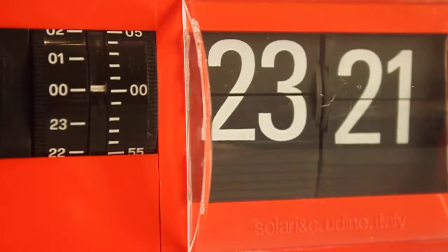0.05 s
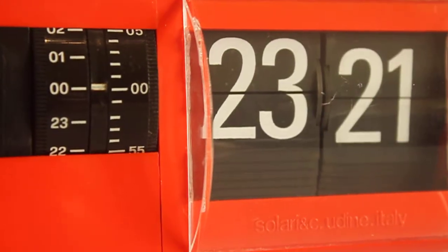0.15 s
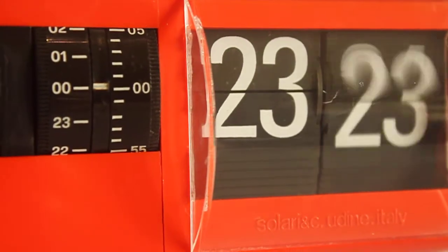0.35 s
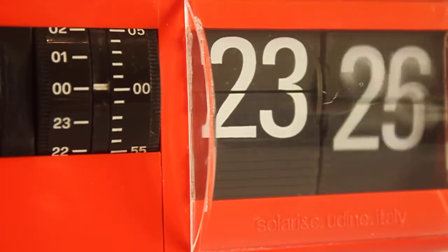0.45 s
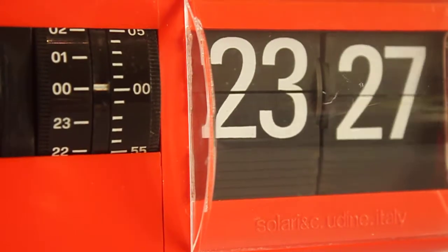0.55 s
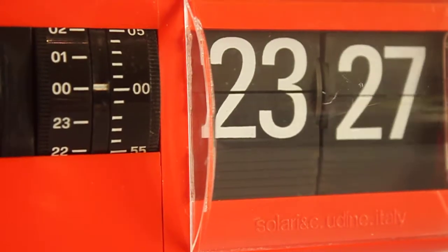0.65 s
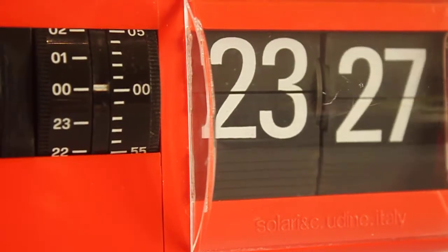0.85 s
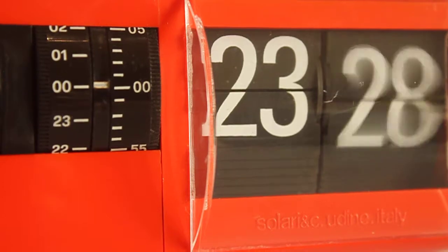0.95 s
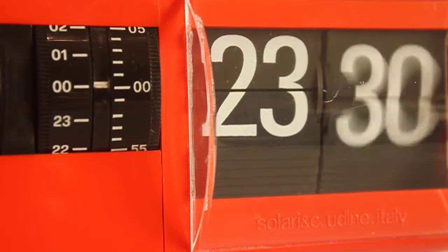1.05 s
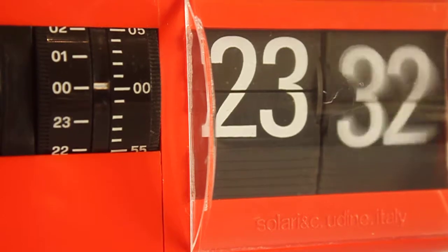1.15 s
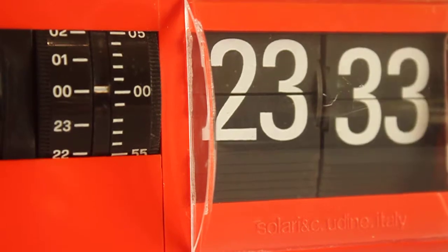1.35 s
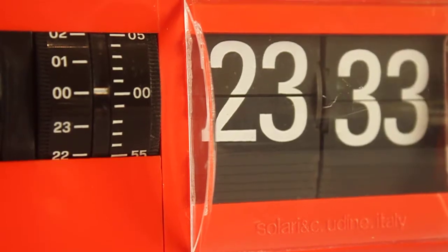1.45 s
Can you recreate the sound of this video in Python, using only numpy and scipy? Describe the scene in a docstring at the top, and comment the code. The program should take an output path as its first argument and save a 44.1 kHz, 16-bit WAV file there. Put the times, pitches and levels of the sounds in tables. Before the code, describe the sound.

A flip clock is wound forward by hand, close by in a quiet room. After soft knocks from the setting wheel, six plastic flaps snap down with quick, bright clicks from about 0.2 to 0.5 seconds. The wheel knocks faintly in the pause, then six more flaps click from 0.9 to 1.15 seconds. A few tiny knocks follow until 1.4 seconds. Near walls echo slightly over faint hum and hiss.

```python
"""In a quiet room, close by, a flip clock is wound forward by hand in two runs of six flaps.
Each plastic flap slips off its catch, slaps the stack of flaps and makes the case ring.
The setting wheel knocks softly in between. Near walls echo, over a faint hum and hiss."""
import sys
import numpy as np
from scipy import signal
from scipy.fft import rfft, irfft
from scipy.io import wavfile

SR = 44100
rng = np.random.default_rng(int(sys.argv[2]) if len(sys.argv) > 2 else 0)


def store_pcm(level_fs):
    """Save levels as 16-bit WAV."""
    pcm = np.round(np.clip(level_fs, -1, 1) * 32767).astype(np.int16)
    wavfile.write(sys.argv[1], SR, np.atleast_2d(pcm).T)


N = 66150
T = np.arange(SR // 5) / SR  # time axis of one short sound, in seconds
HZ = np.fft.rfftfreq(len(T), 1 / SR)  # its frequency axis


def amp(db):
    """Turn decibels into a gain."""
    return 10 ** (np.asarray(db) / 20)


def curve_at(points, hz):
    """Read a curve of (f/Hz, value) points, joined by straight lines on a log frequency axis."""
    freqs, values = np.transpose(points)
    return np.interp(np.log(hz + 1), np.log(freqs + 1), values)


def same_energy(x):
    """Scale a short sound to the energy of 5 ms at a steady level of 1."""
    return x / np.sqrt(np.sum(x ** 2) / (.005 * SR) + 1e-20)


def fade(t60, delay=0, rise=.0002):
    """A loudness shape that waits, rises quickly, then drops 60 dB every t60 seconds."""
    t = np.maximum(T - delay, 0)
    return (1 - np.exp(-t / rise)) * amp(-60 * t / t60)


def rattle(shape):
    """The force of many tiny random contacts, following a loudness shape."""
    return shape * rng.standard_normal(len(T))


def ring(force, tones, pitch=1):
    """A struck part rings at its own tones; the narrower a tone, the longer it lasts."""
    spectrum = rfft(force)
    sound = np.zeros(len(T))
    for k, (centre, width, db) in enumerate(tones):
        resonance = 1j * HZ / ((centre * pitch) ** 2 - HZ ** 2 + 1j * HZ * width)
        tone = same_energy(irfft(spectrum * resonance, len(T)))
        sound += (-1) ** k * amp(db) * tone  # every other tone is flipped in sign
    return same_energy(sound)


def snap(force, colour):
    """A force heard with a broad tone colour and no pitch."""
    sound = irfft(rfft(force) * amp(curve_at(colour, HZ)), len(T))
    return same_energy(sound * (T < T[-1] / 2))


def add(track, start_s, x):
    """Mix a sound into a track at a given time."""
    part = track[round(start_s * SR):][:len(x)]
    part += x[:len(part)]


def in_room(x, spill=0):
    """Add wall echoes and a fading tail to a sound; the spill is heard only through those echoes."""
    # how long the tail takes to drop 60 dB: f/Hz, t/s
    tail_times = [(150, 0.7), (1200, 0.21), (4000, 0.21), (8000, 0.48), (12000, 0.27), (16000, 0.2)]
    # strength of the tail: f/Hz, level/dB
    tail_levels = [(100, -7.5), (400, -6.5), (1200, -7.5), (2500, -6), (4200, -11), (5600, -20),
                   (8000, -20), (10000, -22.5), (12000, -17.5), (13600, -26), (14600, -19), (16000, -15.5)]
    # echoes from near walls: delay/s, level/dB
    walls = [(0.0122, -24), (0.011, -31.5), (.0203, -32)]
    hz, t, noise = signal.stft(rng.standard_normal(SR // 2), SR, nperseg=256)
    t60 = curve_at(tail_times, hz)[:, None]
    gain = amp(curve_at(tail_levels, hz))[:, None]
    gain *= np.sqrt(2 * np.log(1000) / (t60 * SR))  # a longer tail gets no extra energy
    tail = signal.istft(noise * gain * amp(-60 * t / t60), SR, nperseg=256)[1]
    age = np.arange(len(tail)) / SR
    echo = tail * (1 - np.exp(-(age / 0.0086) ** 2))  # the tail takes a moment to build
    for delay, db in walls:
        scatter = rattle(fade(t60=0.0036))
        add(echo, delay, amp(db) * scatter / np.linalg.norm(scatter))
    heard = signal.fftconvolve(x + spill, echo)
    add(heard, 0, x)
    return heard


def room_noise():
    """A faint hum and hiss, a little louder at the start."""
    # tone colour of the noise: f/Hz, relative level/dB
    colour = [(15, -53), (25, -26), (102, -7), (591, -4.5), (659, -1.5), (936, -6), (1020, -4.5),
              (1190, -7), (2910, -13.5), (6050, -16), (6920, -16.5), (14800, -23), (16000, -18)]
    # its loudness over time: t/s, level/dB
    loudness = [(0, -63), (.12, -64.5), (.2, -70.5), (.7, -68.5), (1.5, -67.5)]
    gain = amp(curve_at(colour, np.fft.rfftfreq(N, 1 / SR)))
    noise = irfft(rfft(rng.standard_normal(N)) * gain, N)
    level_db = np.interp(np.arange(N) / SR, *np.transpose(loudness))
    return noise / noise.std() * amp(level_db)


def wheel_knocks():
    """The setting wheel and drum take up their slack with soft knocks: a push and a short rattle."""
    # the knocks: t/s, then level/dB of the thump, hollow knock, clack and tick
    knocks = [(.083, -76, -61, -67, -71), (.112, -67, -71, -64.5, -65), (0.18, -65.5, -54, -52.5, -61),
              (.190, -61.5, -51, -54, -53.5), (.213, -51.5, -54, -65, -58.5), (.252, -71, -54, -70, -69.5),
              (0.2873, -59, -41, -52, -45.5), (0.341, -61, -63, -54, -56.5), (0.527, -73, -57, -70, -72),
              (.551, -79, -58, -60, -63), (0.589, -59.5, -82.5, -73, -79.5), (0.7761, -55, -55.5, -63, -80),
              (0.8171, -74.5, -52, -53, -64), (0.832, -73, -69.5, -74, -62.5), (0.91, -55.5, -51, -49, -57),
              (1.214, -75.5, -62, -58.5, -88), (1.279, -79.5, -76, -75, -65), (1.383, -86, -63.5, -63, -62)]
    # tones of those four parts, from low to high: f/Hz, width/Hz, relative level/dB
    thump = [(75, 25, -10), (138, 43, 1), (213, 180, -7.5)]
    hollow = [(345.6, 38, -4), (411, 57, 3), (516, 250, 3.5)]
    clack = [(858, 200, -7), (1177, 40, 7.5), (1450, 200, 3), (1983, 250, -3)]
    tick = [(2200, 1100, -0.5), (4170, 2200, 0.5), (7100, 2000, -0.5), (12400, 2200, -6.5)]
    push_s = 0.00012  # time for the smooth push to reach its peak
    push = 2.5 * T / push_s * np.exp(-T / push_s)
    out = np.zeros(N)
    for start, *levels in knocks:
        force = push + rattle(fade(t60=0.026, rise=0.00032))
        parts = zip(levels, (thump, hollow, clack, tick))
        knock = sum(amp(db) * ring(force, tones) for db, tones in parts)
        add(out, start, in_room(knock))
    return out


def falling_flaps():
    """Each flap scrapes off its catch, slaps the stack and settles; case and housing ring along."""
    # the flaps: t/s, flight time/ms, slap fade time/ms,
    # level/dB of the bright, middle and low ring, of the case and of the thud, then pitch factor
    flaps = [(0.1996, 1.56, 5, -18.5, -32, -30, -33.5, -43.5, 1.018),
             (0.261, 0.58, 13, -23.5, -29, -36.5, -34.5, -42, 1.02),
             (0.3335, 0.83, 4.8, -21, -31, -40, -37, -48, 1.022),
             (0.3897, 1.36, 5, -19.5, -36, -39, -40, -45.5, 1.005),
             (0.4271, 0.99, 5.5, -22, -33.5, -40, -40.5, -47, 1.0),
             (0.4692, 0.76, 11, -24, -34, -41, -40, -57, 0.973),
             (0.889, 1.1, 7.6, -21.5, -29, -32, -33.5, -51.5, 1.036),
             (0.9405, 0.88, 12.6, -20.5, -30, -32, -36, -47.5, 1.0),
             (0.9949, 1.0, 5.3, -21, -29, -29.5, -35, -50, 1.014),
             (1.0447, 0.56, 11.7, -22.5, -32.5, -30, -35, -53, 1.014),
             (1.0873, 1.04, 3, -22.5, -36, -30.5, -39, -53.5, 1.015),
             (1.1345, 1, 4, -22.5, -38, -37, -38, -49, 1.01)]
    # tones of a flap, in three groups: f/Hz, width/Hz, relative level/dB
    bright = [(11100, 450, -7), (11514, 350, 0.5), (12090, 796, 7), (12920, 960, 9.5), (13340, 760, 7.5),
              (13800, 400, -12.5), (15900, 600, -18)]
    middle = [(7000, 260, 1.5), (8000, 320, -0.5), (8770, 230, -7)]
    low = [(4890, 280, -6), (5550, 210, 7), (6340, 340, -12.5)]
    # tones of the case and of the hollow housing: f/Hz, width/Hz, relative level/dB
    case_tones = [(1211.5, 78, -0.5), (1524, 150, -1.5), (1947, 230, 1.5), (2400, 410, 1),
                  (3014, 180, -2.5), (3770, 389, -2), (4730, 170, -2.5)]
    housing_tones = [(449, 130, -4.5), (700, 130, -1), (930, 140, -3.5)]
    # the slap's crack, and the hiss the flap faces throw into the room: f/Hz, relative level/dB
    crack_colour = [(200, -30.5), (600, -3), (1200, -4), (3000, -1.5), (9000, -6.5), (16000, -8)]
    spill_colour = [(2000, -17.5), (4500, -5.5), (6300, -3), (9500, 0.5), (14500, -0.5), (16000, -1.5)]
    chatter_t60_s, spike_width_s = .016, .000012
    out = np.zeros(N)
    for start, flight_ms, slap_ms, bright_db, middle_db, low_db, case_db, thud_db, pitch in flaps:
        flight = flight_ms / 1000
        scrape = amp(2.5) * fade(chatter_t60_s) * (T < flight)
        slap = fade(slap_ms / 1000, delay=flight)
        settle = amp(-10.5) * fade(chatter_t60_s, delay=flight)
        contact = scrape + slap + settle
        spike = 4.34 * np.exp(-((T - flight) / spike_width_s) ** 2 / 2)  # the slap's hard first instant
        groups = [(bright_db, bright), (middle_db, middle), (low_db, low)]
        flap = sum(amp(db) * ring(spike + rattle(contact), tones, pitch) for db, tones in groups)
        case = ring(spike + rattle(fade(t60=0.029)), case_tones)  # the stack shakes the case
        crack = amp(-8.5) * snap(spike + rattle(contact), crack_colour)
        thud = ring(rattle(fade(t60=0.019, delay=.0028)), housing_tones)
        spill = amp(middle_db + 6.5) * snap(spike + rattle(contact), spill_colour)
        direct = flap + amp(case_db) * (case + crack) + amp(thud_db) * thud
        add(out, start, in_room(direct, spill))
    return out


def scene():
    """The clock in its room, on one channel."""
    return (falling_flaps() + wheel_knocks() + room_noise())[None]


def record(dry):
    """The small microphone thins the bass, and the recorder cuts the very highest treble."""
    low_cut_hz, top_hz = 44, 16000
    thin = signal.sosfilt(signal.butter(2, low_cut_hz, "high", fs=SR, output="sos"), dry)
    return signal.sosfiltfilt(signal.butter(12, top_hz, fs=SR, output="sos"), thin)


dry = scene()
out = record(dry)
store_pcm(out)
```